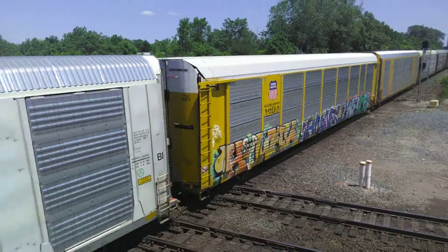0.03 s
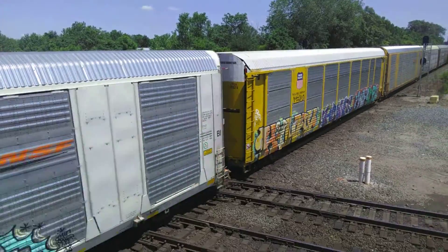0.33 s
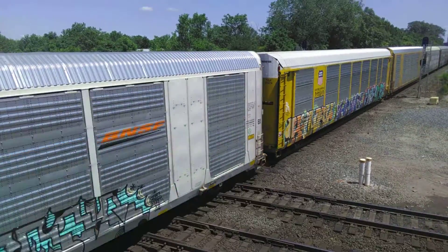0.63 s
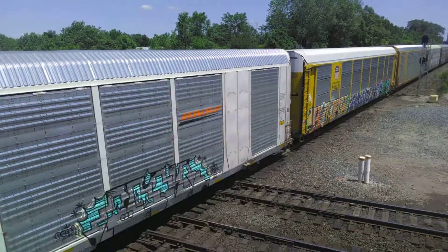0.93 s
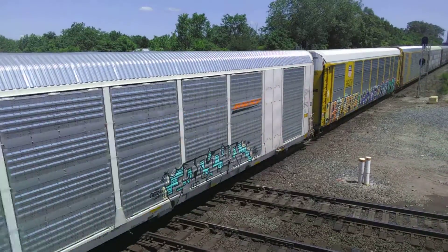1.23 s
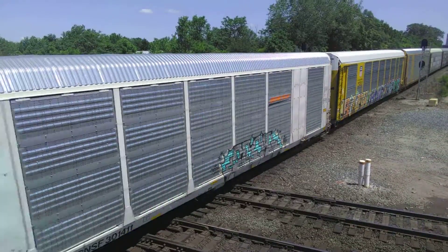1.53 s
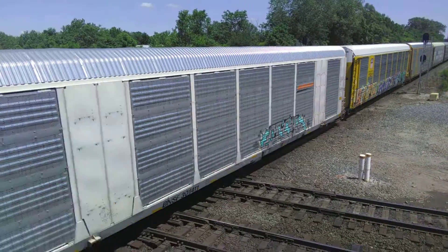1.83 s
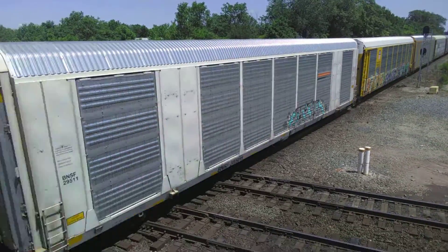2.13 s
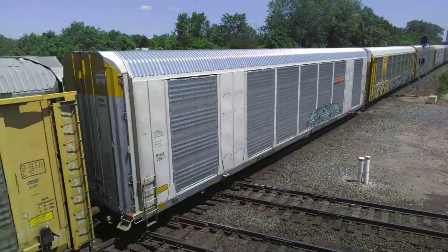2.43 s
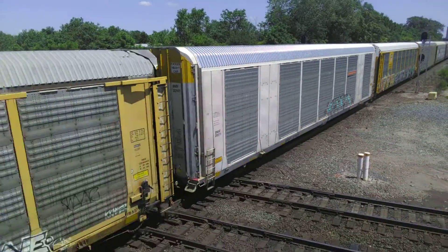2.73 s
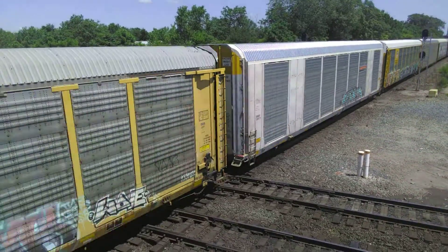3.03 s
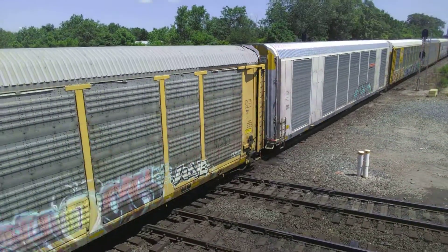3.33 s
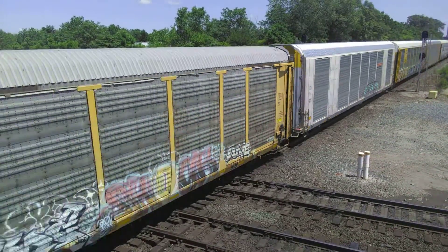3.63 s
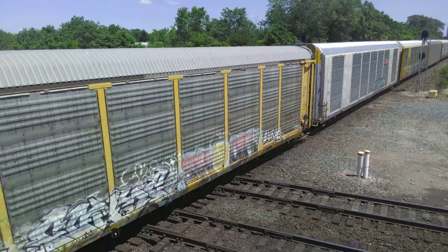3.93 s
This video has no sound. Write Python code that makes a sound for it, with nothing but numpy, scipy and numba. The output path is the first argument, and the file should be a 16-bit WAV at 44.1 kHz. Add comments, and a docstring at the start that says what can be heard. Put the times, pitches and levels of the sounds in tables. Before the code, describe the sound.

A freight train rolls past just below the microphone in open country. Its wheels clang and clatter over a track crossing, ease into a low rumble, then hammer again as panels rattle and hollow cars thud.

```python
"""Train wheels hammer the gap in a track crossing as tall steel car carriers roll over it.
Each blow makes the steel clang, the parts under the car clatter and loose panels sizzle.
The hollow car bodies drum and thud, couplers knock and small parts chink.
Between two groups of wheels it is quieter, mostly the roar of rolling.
The train passes a few metres below the listener, in open country with a faint echo."""
import sys
import numpy as np
from scipy import signal
from scipy.fft import rfft, irfft
from scipy.io import wavfile
from scipy.ndimage import uniform_filter1d
from numba import njit

SR = 44100
rng = np.random.default_rng(int(sys.argv[2]) if len(sys.argv) > 2 else 0)


def waveform_to_disk(signal):
    """Save audio, clipped to [-1, 1], as 16-bit WAV at the path in sys.argv[1]."""
    frames = np.transpose(np.atleast_2d(signal))
    scaled = np.clip(frames, -1, 1) * 32767
    samples = np.round(scaled).astype(np.int16)
    wavfile.write(sys.argv[1], SR, samples)


N = 176400  # 4 seconds

# How fast each kind of sound builds up (attack) and dies away (fall).
CLANG_ATTACK_S, CLANG_FALL_S = 0.008, 0.018
CLATTER_ATTACK_S, CLATTER_FALL_S = 0.007, 0.03
SIZZLE_ATTACK_S, SIZZLE_FALL_S = 0.018, 0.041


def from_db(db):
    """Turn decibels into a number to multiply by."""
    return 10 ** (np.asarray(db) / 20)


def unit(x):
    """Scale a sound to an average strength (rms) of 1."""
    return x / np.sqrt(np.mean(x ** 2) + 1e-18)


def noise(gain, size=N):
    """Noise of strength 1; gain(f) sets the share of each frequency f."""
    spectrum = rfft(rng.standard_normal(size))
    f = np.arange(len(spectrum)) * SR / size + 1e-3
    return unit(irfft(spectrum * gain(f), size))


def tone_curve(points):
    """A gain curve through (pitch_hz, level_db) points."""
    hz, db = np.array(points, float).T
    return lambda f: from_db(np.interp(np.log(f), np.log(hz), db))


def metallic(gain, ripple_db=3, spacing_hz=75):
    """Add random peaks and dips to a gain curve, like the crowded overtones of steel."""
    db = ripple_db * np.clip(rng.standard_normal(320), -2, 2)
    return lambda f: gain(f) * from_db(np.interp(f / spacing_hz, np.arange(len(db)), db))


def resonance(f, pitch_hz, width_hz):
    """How a part that rings at one pitch responds to each frequency f."""
    return 1 / (1 + 1j * (f * f - pitch_hz * pitch_hz) / (f * width_hz))


@njit
def moving_band(x, centre_hz, width):
    """Keep the sound near a moving pitch; width is a share of that pitch."""
    out, band_state, low_state = np.empty(len(x)), 0., 0.
    for i in range(len(x)):
        g = np.tan(np.pi * centre_hz[i] / SR)
        band = (band_state + g * (x[i] - low_state)) / (1 + g * (g + width))
        band_state = 2 * band - band_state
        low_state += 2 * g * band
        out[i] = width * band
    return out


def wander(steps_per_s):
    """A smooth random curve that typically strays about 1 from zero."""
    hold = int(SR / steps_per_s)
    steps = rng.standard_normal(N)[np.arange(N) // hold]
    return unit(uniform_filter1d(uniform_filter1d(steps, hold), hold))


def vibration(gain, size=16384, span_s=0.062):
    """Random shaking, with swells slower than span_s evened out."""
    x = noise(gain, size)
    return x / np.sqrt(uniform_filter1d(x * x, int(span_s * SR)) + 1e-9)


def swinging(x, evenness):
    """A heavy plate swings on with a wandering pitch; evenness (0 to 1) smooths its loudness."""
    swing = np.abs(signal.hilbert(unit(x)))
    return unit(x / (swing ** 2 + 0.05) ** (evenness / 2))


def chatter(size=16384, hits_per_s=240, spread_db=1.5, fall_s=0.0009, share=0.46):
    """The strength of a bouncing steel contact: many tiny hits, each dying at once."""
    hits = (rng.random(size) < hits_per_s / SR) * from_db(spread_db * rng.standard_normal(size))
    bounce = unit(signal.lfilter([1], [1, -np.exp(-1 / (fall_s * SR))], hits))
    return unit(1 - share + share * 2 * np.tanh(bounce / 2))


def place(out, x, start_s, level_db, attack_s, length_s, fall_s):
    """Mix x into out: it builds up, holds until length_s is over and dies away."""
    run_up_s = 0.04  # room for the swell to begin just before start_s
    t = np.arange(len(x)) / SR - run_up_s
    rise = (1 + np.tanh((t - attack_s / 2) / (0.78 * attack_s))) / 2
    fall = np.exp(-np.maximum(t - length_s, 0) / fall_s)
    x = x * from_db(level_db) * rise * fall
    i = int((start_s - run_up_s) * SR)
    x, i = x[max(-i, 0):], max(i, 0)
    out[i:i + len(x)] += x[:max(N - i, 0)]


# Loudness of the rolling over time: time_s, level_db
ROLLING_LEVELS = [(0, -29), (.9, -22), (1.2, -24.5), (1.6, -27), (1.9, -26), (2.12, -26), (2.4, -22.5),
                  (3.4, -23), (3.75, -23), (4, -29.5)]
# Tone of the rolling: pitch_hz, level_db
ROLLING_TONE = [(20, -19), (35, -13), (62, 4), (100, 3), (140, 5.5), (250, -1.5), (400, -1.5), (600, -9.5),
                (850, -8), (1300, -15), (2200, -19), (4200, -21), (6500, -26), (9000, -35.5), (12000, -44),
                (16000, -50)]


def rolling(t):
    """Rough wheels roar on the rails, with a slight flutter in loudness."""
    time_s, level_db = np.array(ROLLING_LEVELS).T
    roar = noise(tone_curve(ROLLING_TONE))
    return roar * from_db(np.interp(t, time_s, level_db) + 2.74 * wander(18))


def echo(x, level_db=-18.5, fall_s=0.17, dull_above_hz=4970):
    """The cars and trees scatter back a faint, dull copy of the sound."""
    t = np.arange(32768) / SR
    tail = noise(lambda f: 1 / (1 + (f / dull_above_hz) ** 2), len(t))
    tail *= np.exp(-t / fall_s) * np.minimum(t / 0.04, 1)
    return from_db(level_db) * unit(signal.fftconvolve(x, tail)[:N]) * np.std(x)


# Panels shaking on their own: start_s, length_s, level_db
PANEL_SHAKES = [(0.194, 0.045, -35.5), (0.354, 0.0089, -29), (0.461, 0.055, -22.5), (1.74, 0.03, -34),
                (1.879, 0.037, -24.5), (2.654, 0.07, -25.5), (2.793, 0.024, -25), (3.799, 0.024, -30),
                (3.939, 0.022, -34)]
# Tone of those panels: pitch_hz, level_db
PANEL_TONE = [(2000, 1), (4800, 1.5), (5500, 8.5), (6800, 6), (8000, -2.5), (11000, -17), (16000, -39)]
# Bright chinks of small steel parts: start_s, length_s, level_db
SMALL_CHINKS = [(3.275, 0.075, -25.5), (3.53, 0.04, -16), (3.669, 0.014, -21)]
# Tone of a chink: pitch_hz, level_db
CHINK_TONE = [(2500, 3.5), (4600, -5.5), (5500, 4), (6800, 6), (8500, -6), (11500, -25), (12800, -3),
              (16000, -10)]


def loose_parts():
    """Loose panels shake and small parts chink as steel bounces on steel."""
    out = np.zeros(N)
    for start_s, length_s, level_db in PANEL_SHAKES:
        shake = chatter() * vibration(metallic(tone_curve(PANEL_TONE)))
        place(out, shake, start_s, level_db, SIZZLE_ATTACK_S, length_s, SIZZLE_FALL_S)
    for start_s, length_s, level_db in SMALL_CHINKS:
        chink = chatter() * vibration(tone_curve(CHINK_TONE))
        place(out, chink, start_s, level_db, CLANG_ATTACK_S, length_s, CLATTER_FALL_S)
    return out


# Single knocks: start_s, length_s, pitch_hz, level_db
COUPLER_KNOCKS = [(0.714, 0.056, 3150, -28.5), (0.965, 0.019, 1690, -16), (1.085, 0.01, 2040, -28),
                  (1.488, 0.052, 1880, -32.5), (1.673, 0.022, 940, -30), (1.843, .03, 430, -21.5),
                  (1.894, 0.017, 1480, -36), (2.339, .05, 3000, -10.5)]


def knocks():
    """Distant wheels and the couplers that link the cars knock, and hardly ring."""
    out = np.zeros(N)
    for start_s, length_s, pitch_hz, level_db in COUPLER_KNOCKS:
        knock = vibration(lambda f: resonance(f, pitch_hz, 0.72 * pitch_hz) ** 2)
        place(out, knock, start_s, level_db, attack_s=0.23 * length_s, length_s=length_s, fall_s=0.0089)
    return out


# Thuds and booms: start_s, length_s, pitch_hz, level_db
BODY_THUDS = [(0.317, 0.025, 101, -18.5), (0.36, 0.035, 205, -14.5), (.498, 0.077, 114, -12.5),
              (.633, 0.052, 131, -9), (.695, 0.097, 155, -19.5), (0.737, 0.016, 70.4, -14.5),
              (0.787, 0.01, 114, -11.5), (0.851, 0.11, 296, -14.5), (0.949, 0.074, 243, -22.5),
              (1.025, 0.04, 142, -13), (1.079, 0.018, 99, -18.5), (1.674, 0.021, 194, -14),
              (1.72, 0.037, 50, -17.5), (1.858, 0.0078, 216, -14.5), (2.021, 0.027, 55, -27),
              (2.407, 0.0083, 270, -5.5), (2.553, 0.018, 247, -8), (2.635, 0.036, 138.5, -9.5),
              (2.677, 0.041, 79, -21), (2.725, 0.036, 440, -9), (2.932, 0.011, 123, -10.5),
              (3.009, 0.012, 97, -9.5), (3.085, 0.019, 99, -13), (3.359, 0.069, 190, -15.5),
              (3.436, 0.023, 59.6, -21.5), (3.451, 0.081, 128, -13), (3.6, 0.046, 123, -13),
              (3.651, 0.01, 390, -19), (3.754, 0.022, 132, -16), (3.813, 0.057, 116, -14),
              (3.965, 0.015, 117, -16.5)]


def thuds():
    """The hollow car bodies thud on their springs."""
    out = np.zeros(N)
    for start_s, length_s, pitch_hz, level_db in BODY_THUDS:
        boom = vibration(lambda f: resonance(f, pitch_hz, 0.56 * pitch_hz) ** 2)
        thud = swinging(boom, evenness=0.65)
        place(out, thud, start_s, level_db, attack_s=0.0075, length_s=length_s, fall_s=0.014)
    return out


# How the drumming changes over time: time_s, level_db, pitch_hz
WALL_DRUMMING = [(0, -5.5, 256), (.26, -14, 216), (.3, -22, 255), (.38, -15, 216), (.45, -7.5, 236),
                 (.5, -24, 243), (.73, -15, 202), (.81, -9.5, 250), (0.869, -13.5, 320), (1.05, -12, 287),
                 (1.14, -55, 249), (1.6, -40.5, 277), (2.13, -33, 310), (2.185, -12, 390), (2.39, -7, 340),
                 (2.6, -23, 257), (2.68, -16.5, 265), (2.75, -5.5, 357), (2.8, -17, 293), (2.96, -25, 296),
                 (3.02, -18, 363), (3.08, -17, 270), (3.17, -7.5, 387), (3.23, -13.5, 433),
                 (3.33, -27, 377), (3.45, -28, 232), (3.528, -15, 320), (3.7, -41, 310), (3.781, -24, 261),
                 (4, -24.5, 262)]


def drumming(t, trim_db=-2.5, flutter_db=4):
    """The steel side walls drum, sliding in pitch and fluttering in loudness."""
    time_s, level_db, pitch_hz = np.array(WALL_DRUMMING).T
    centre_hz = np.interp(t, time_s, pitch_hz)
    walls = rng.standard_normal(N)
    for _ in range(3):  # each pass narrows the band
        walls = moving_band(walls, centre_hz, 0.8)
    loudness = from_db(np.interp(t, time_s, level_db) + trim_db + flutter_db * wander(23.86))
    return swinging(walls, evenness=0.35) * loudness


# Tone of rattling steel, for both the buzz and the clatter: pitch_hz, level_db
RATTLE_TONE = [(120, -4), (450, 3), (1100, -29), (1550, 5), (1950, -3), (2330, 0), (3300, -1), (3900, -9),
               (4800, -12.5), (16000, -15)]


def buzz(body, level_db=-36):
    """Loose parts tap once on each outward swing of the car body."""
    taps = np.tanh(np.maximum(unit(body), 0) ** 2 / 2)
    rattle = noise(lambda f: tone_curve(RATTLE_TONE)(f) / (1 + (f / 8000) ** 4))
    return from_db(level_db) * unit(taps * rattle)


def clatter(contact):
    """The bouncing contact of a wheel rattles the parts under the car."""
    return contact * vibration(metallic(tone_curve(RATTLE_TONE)))


# Tone of panels jolted by a wheel, before the lower pitches are turned down: pitch_hz, level_db
SIZZLE_TONE = [(300, -15), (1500, 8), (3500, 6), (5600, 6), (6500, 3.5), (7500, 2), (9500, -1.5),
               (12500, -7.5), (16000, -18)]


def sizzle(contact, edge_hz=5000, below_edge_db=-12.5):
    """Jolted panels sizzle; they pass sound to the air well only above edge_hz."""
    def gain(f):
        below_edge = (1 - np.tanh((f - edge_hz) / 70)) / 2
        return tone_curve(SIZZLE_TONE)(f) * from_db(below_edge_db * below_edge)
    return contact * vibration(metallic(gain))


# Overtones of one set of wheels: pitch_hz, level_db
WHEEL_OVERTONES = [(755, 2), (905, -1.5), (1085, -42), (1462, -7), (1535, -18), (2030, -19), (2630, -15),
                   (2900, -17), (3310, -11)]


def singing(width_hz=59):
    """The first wheels to be struck ring on in narrow overtones."""
    def gain(f):
        return sum(from_db(db) * np.abs(resonance(f, hz, width_hz)) ** 2 for hz, db in WHEEL_OVERTONES)
    out = np.zeros(N)
    ring = vibration(gain, size=N)
    place(out, ring, start_s=0, level_db=-22.5, attack_s=CLANG_ATTACK_S, length_s=0.36, fall_s=0.34)
    return out


# Pitches at which wheel and crossing ring: pitch_hz, width_hz, level_db
STEEL_RINGS = [(402, 25, -11), (758, 88, 14.5), (820, 84, 7.5), (840, 120, -17.5), (950, 120, 11),
               (1137, 210, 8.5), (1423, 116, 7)]


def clang(pitch_hz):
    """Wheel and crossing ring together; the blow favours their tones near pitch_hz."""
    def gain(f):
        power = sum(np.abs(from_db(db) * resonance(f, hz, width)) ** 2 for hz, width, db in STEEL_RINGS)
        return np.sqrt(power) * resonance(f, pitch_hz, width_hz=300)
    return swinging(vibration(gain), evenness=0.4)


# Wheels hitting the gap: start_s, length_s, pitch_hz, clang_db, clatter_db, sizzle_db
WHEEL_BLOWS = [(0.0, 0.057, 730, -8, -10.5, -17), (0.157, 0.011, 730, -7.5, -14, -20),
               (0.282, 0.039, 900, -8, -13, -13.5), (0.407, 0.052, 905, -7.5, -12.5, -9),
               (0.554, 0.035, 890, -15, -17.5, -14), (0.659, 0.04, 930, -26, -20.5, -29),
               (0.727, 0.062, 970, -23.5, -30, -60), (0.812, 0.022, 930, -8.5, -10.5, -18),
               (0.963, 0.034, 970, -16, -21.5, -28), (2.167, 0.054, 950, -6.5, -12.5, -14),
               (2.24, 0.11, 950, -20, -20.5, -18.5), (2.318, 0.065, 960, -6.5, -13.5, -11),
               (2.449, 0.019, 860, -6.5, -14, -13.5), (2.491, 0.034, 970, -15.5, -17.5, -16.5),
               (2.571, 0.02, 970, -20, -21.5, -14), (2.605, 0.018, 930, -12.5, -19.5, -23),
               (2.725, 0.036, 884, -10.5, -14, -12.5), (2.863, 0.012, 940, -8, -16, -16.5),
               (2.981, 0.028, 860, -11, -15, -20.5), (3.037, 0.033, 1080, -18.5, -22, -23),
               (3.116, 0.046, 960, -9, -16.5, -12.5), (3.177, 0.017, 1000, -14, -15, -16.5),
               (3.267, 0.03, 1080, -19, -24.5, -24), (3.527, 0.061, 980, -37, -24.5, -32),
               (3.717, 0.07, 710, -26.5, -51, -51)]


def wheel_blows(clatter_lag_s=0.003, sizzle_lag_s=0.0017):
    """Each blow rings the crossing, then shakes the parts under the car and the panels."""
    out = np.zeros(N)
    for start_s, length_s, pitch_hz, clang_db, clatter_db, sizzle_db in WHEEL_BLOWS:
        contact = chatter()  # clatter and sizzle share the same bounces
        place(out, clang(pitch_hz), start_s, clang_db, CLANG_ATTACK_S, length_s, CLANG_FALL_S)
        place(out, clatter(contact), start_s + clatter_lag_s, clatter_db,
              CLATTER_ATTACK_S, length_s, CLATTER_FALL_S)
        place(out, sizzle(contact), start_s + sizzle_lag_s, sizzle_db,
              SIZZLE_ATTACK_S, length_s, SIZZLE_FALL_S)
    return out


def scene():
    """Wheels, loose parts and car bodies with their echo, over the rolling roar, in one channel."""
    t = np.arange(N) / SR
    body = thuds() + drumming(t)
    near = wheel_blows() + singing() + loose_parts() + knocks() + body + buzz(body)
    return (near + echo(near) + rolling(t))[None]


@njit
def follow_peaks(x, attack_s, release_s):
    """Track how loud the peaks are, rising over attack_s and sinking over release_s."""
    out, level = np.empty(len(x)), 0.
    for i in range(len(x)):
        lag_s = attack_s if abs(x[i]) > level else release_s
        level += (abs(x[i]) - level) / (lag_s * SR)
        out[i] = level
    return out


def record(dry):
    """Thin the deepest bass, hold down loud moments, round the peaks and cut the highest treble."""
    low_cut_hz, top_hz = 35, 15850
    limit_db, look_ahead_s, ceiling = -2.6, 0.0009, 0.88
    thinned = signal.sosfilt(signal.butter(2, low_cut_hz, "high", fs=SR, output="sos"), dry)
    peak = follow_peaks(thinned[0], attack_s=0.0002, release_s=0.014)
    coming_peak = uniform_filter1d(np.roll(peak, -int(look_ahead_s * SR)), size=64)
    held = thinned / (1 + (coming_peak / from_db(limit_db)) ** 4) ** (1 / 4)
    rounded = held / (1 + np.abs(held / ceiling) ** 8) ** (1 / 8)
    return signal.sosfiltfilt(signal.ellip(8, 0.05, 60, top_hz, fs=SR, output="sos"), rounded)


dry = scene()
out = record(dry)
waveform_to_disk(out)
```